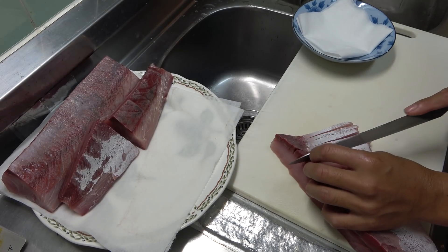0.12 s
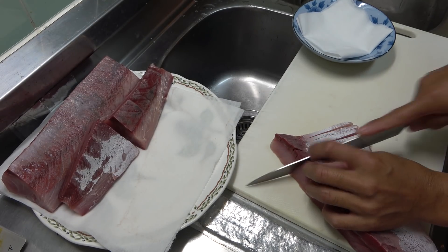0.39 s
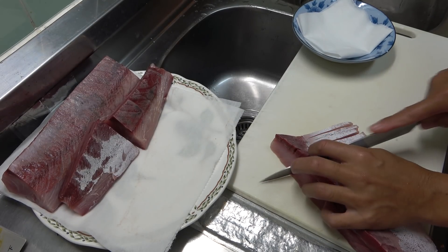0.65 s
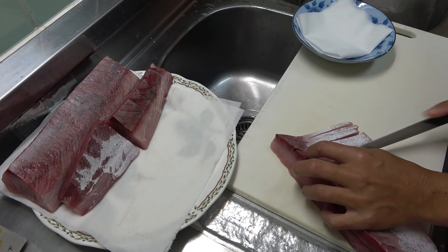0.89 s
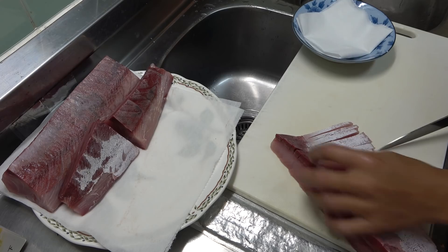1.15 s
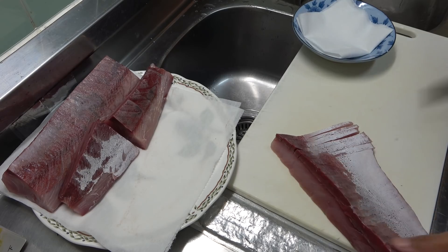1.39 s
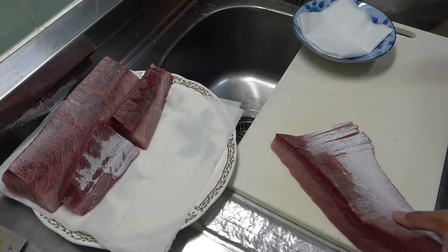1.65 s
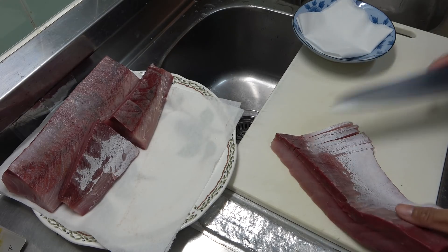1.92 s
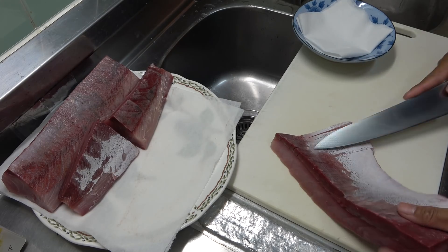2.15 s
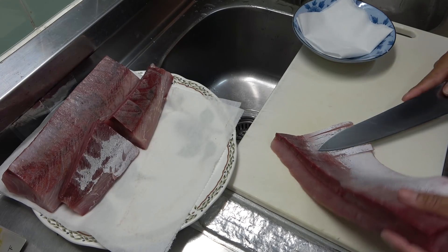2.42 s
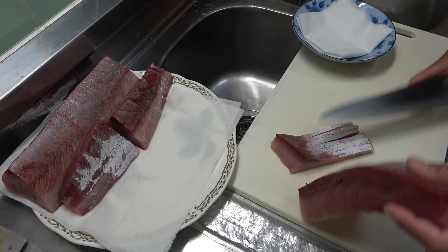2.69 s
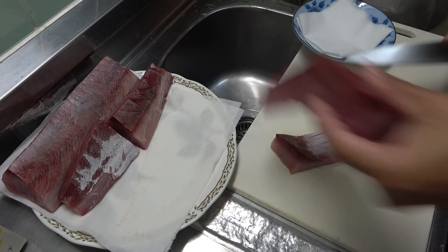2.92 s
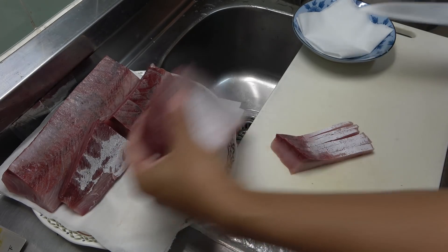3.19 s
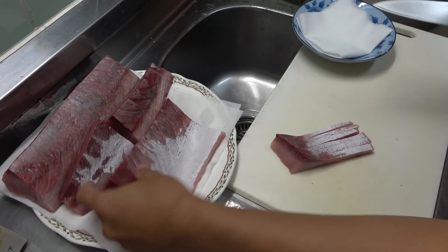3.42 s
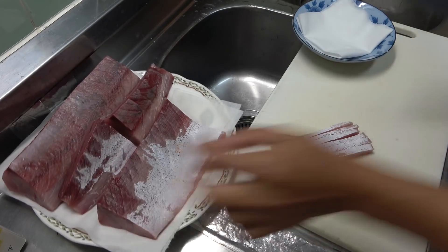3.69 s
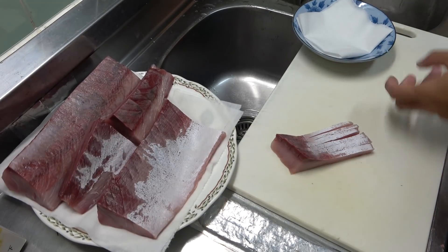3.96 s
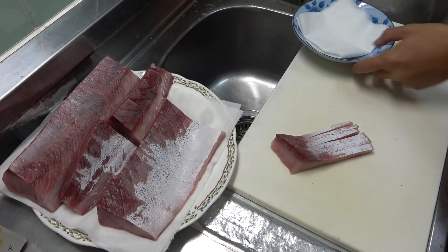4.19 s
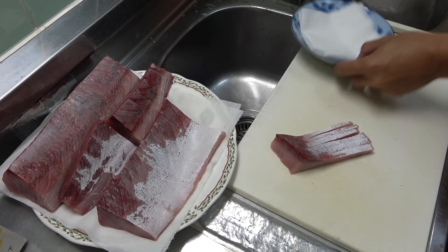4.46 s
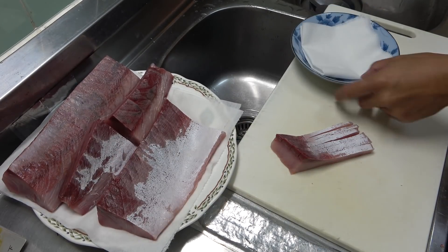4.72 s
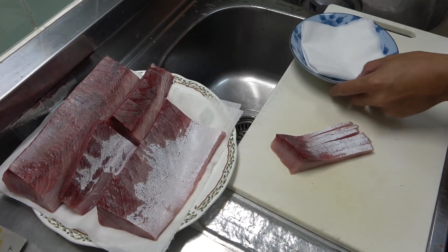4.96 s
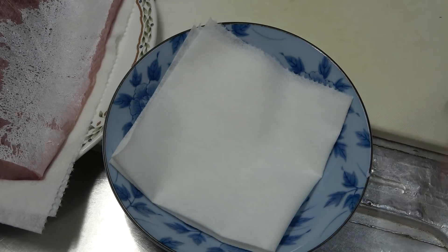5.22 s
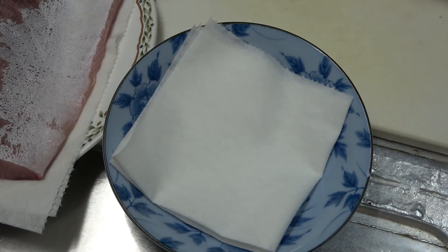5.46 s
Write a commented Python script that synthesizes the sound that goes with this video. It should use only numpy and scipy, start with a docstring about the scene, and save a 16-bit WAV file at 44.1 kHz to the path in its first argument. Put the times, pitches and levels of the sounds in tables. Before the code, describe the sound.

A low fan hum and soft hiss fill a small kitchen, heard close in stereo. A firm knock lands at 0.4 s with a short hollow counter rumble. Gentle blade rubbing and very faint fuzzy whistles follow until 1.3 s, with a small knock at 1.4 s. From 1.5 to 2.5 s wet flesh peels with bright ticks and fine crackle, among light knocks. Soft rubbing returns near 2.8 s. At 3.3 s a heavy, boomy knock hits the board, followed by a scrape; from 3.65 to 4.4 s the put-down knife rocks in paired, fading knocks with metallic pings. A bowl drags with a short groan around 4.45 s, bumps down in a quick cluster at 4.55 s, and rings faintly. At 5.0 s sound vanishes for an instant; the hum returns louder, with low handling rumble, swelling rubs and a few dull knocks until about 5.55 s.

```python
"""A knife slices raw fish on a plastic board lying on a steel counter, while a fan hums (shaped noise).
First the blade rubs (swelling noise), whistles faintly (fuzzy tones) and knocks (ringing modes and clatter),
and wet flesh ticks and crackles (short noise bursts and grainy noise). A heavy knock lands at 3.3 s; then the
knife, put down, rocks with fading knocks and pings. At 4.5 s a bowl drags, bumps down and rings faintly.
At 5.0 s all sound stops for about 0.03 s; the hum comes back louder, with more rubbing and a few knocks."""
import sys
import numpy as np
from scipy import signal
from scipy.fft import rfft, irfft, next_fast_len
from scipy.io import wavfile
from scipy.ndimage import uniform_filter1d

SR = 44100
rng = np.random.default_rng(int(sys.argv[2]) if len(sys.argv) > 2 else 0)


def dump_mix(stems):
    """Bounce the given channels to the path in sys.argv[1] as a 16-bit WAV at rate SR."""
    frames = np.atleast_2d(stems).T  # one column per channel
    limited = np.clip(frames, -1, 1)  # hard clip at full scale
    pcm = np.round(limited * 32767).astype(np.int16)
    wavfile.write(sys.argv[1], SR, pcm)


def invert_db(x):
    """Field ratio 10**(x/20) for x, a level in decibels (scalar or array-like)."""
    u = np.asarray(x, float) / 20
    return 10 ** u


N = 246959  # length in samples

# colour of the fan and microphone hiss: pitch_hz, level_db (per Hz)
FAN_COLOUR = [(15, -50), (25, -8), (134, -5.5), (206, -17), (384, -9.5), (439, -7), (503, -7.5), (607, -4),
              (659, 2), (988, -5.5), (1070, -9.5), (1370, -6.5), (1610, -37), (8830, -27), (16000, -36.5)]
# loudness of the fan and hiss over time: time_s, level_db
FAN_LEVEL = [(0, -53), (.8, -52), (2.6, -52), (5.0, -49.5), (5.04, -43.5), (5.6, -45)]
# how much stronger the left side is than the right: pitch_hz, left_over_right_db
LEFT_LEAN = [(100, 0), (300, .3), (700, 2.2), (1500, .6), (5000, .4), (14000, .8)]
# how alike left and right are for near sounds: pitch_hz, likeness (0 to 1)
NEAR_LIKENESS = [(60, .995), (150, .986), (400, .972), (900, .97), (2400, .985), (6000, .91), (15000, .72)]
# the same for the fan, heard from all around: pitch_hz, likeness (0 to 1)
FAN_LIKENESS = [(60, 1), (150, 0.33), (400, 0.64), (950, .8), (2400, 0.71), (6000, 0.13), (15000, 0.26)]

# colour of the counter's shaking: pitch_hz, level_db (per Hz)
SHAKE_COLOUR = [(20, -43), (40, 15.5), (70, -12), (100, 3), (160, 14), (300, 9.5), (500, 2.5), (1000, -51)]
# lowest modes of the counter, kept going by handling: pitch_hz, level_db, width_hz
COUNTER_BOOM = [(102.4, -1.5, 38), (160.3, -3.5, 8.3), (275.4, -4, 27), (447, -9, 33)]
# handling and heavy blows leave the counter shaking: strongest_s, rise_s, fall_s, level_db
SHAKES = [(.37, 0.17, 0.09, -48), (.45, 0.042, .13, -35), (.62, 0.18, 0.31, -50.5), (1.02, 0.073, .08, -57),
          (1.48, 0.12, 0.091, -55.5), (1.71, 0.085, .2, -48), (2.03, 0.26, 0.21, -54.5),
          (2.83, 0.17, 0.089, -51.5), (2.98, 0.1, 0.22, -56), (3.25, 0.11, .07, -51.5),
          (3.45, 0.17, 0.29, -34.5), (3.77, 0.21, 0.32, -35.5), (4.1, 0.4, 0.26, -41),
          (4.33, 0.19, 0.14, -42), (4.52, .12, .09, -37), (4.66, .08, 0.32, -39.5), (5.08, 0.13, 0.23, -40),
          (5.37, 0.22, 0.26, -42.5)]

# ringing modes of the glazed bowl: pitch_hz, level_db, width_hz
BOWL_MODES = [(3700, -8, 20), (5200, -8, 20), (8230, 1, 20), (9335, -2, 25), (10557, -7, 30),
              (11138, -6, 30), (12715, -12, 30), (13500, -14, 30)]
# the bowl's foot dragging or touched: strongest_s, rise_s, fall_s, level_db
BOWL_TOUCHES = [(4.29, .03, .06, -68), (4.5, .12, .22, -55), (4.75, .12, .2, -70), (5.0, .12, .12, -67),
                (5.555, .02, .06, -57)]
# modes of the board under the dragged bowl: pitch_hz, level_db, width_hz
DRAGGED_BOARD_MODES = [(199, 0, 25), (522, -10, 40), (684, -13, 70), (1120, -14, 70), (1620, -14, 90),
                       (2590, -22, 70), (2850, -22, 90), (4450, -25, 70), (5160, -27, 50), (5820, -28, 70)]
# loudness of the drag over time: time_s, level_db
DRAG_LEVEL = [(4.39, -68), (4.43, -37.5), (4.46, -30.5), (4.499, -25.5), (4.531, -29), (4.56, -44),
              (4.6, -90)]
# the bowl's foot bumping down on the board: time_s, knock_db, boom_db, body_db, edge_db
BOWL_BUMPS = [(4.536, -28.5, -46, -24, -45), (4.549, -21, -26.5, -14.5, -34.5),
              (4.561, -13, -21, -18, -25.5), (4.578, -27, -28, -25, -33)]

# colour of the crackle: pitch_hz, level_db (per Hz)
CRACKLE_COLOUR = [(4000, -30), (7000, -17), (9500, -4), (12000, -5), (16000, -19)]
# wet flesh peeling, a fine crackle: strongest_s, rise_s, fall_s, level_db
PEELS = [(1.65, .04, .07, -62), (1.77, .07, .1, -52.5), (2.1, 0.1, 0.17, -54.5), (2.28, 0.033, .06, -62)]
# wet flesh letting go of board and blade: time_s, level_db (before the snap's shape), centre_hz
TICKS = [(0.2324, -37.5, 4610), (0.4897, -33, 3620), (0.7881, -32, 7380), (1.2994, -44, 9320),
         (1.49, -34.5, 8360), (1.6312, -30.5, 10300), (1.7162, -29, 9600), (1.7394, -38, 7880),
         (1.7823, -25, 10400), (1.819, -36.5, 8770), (1.8394, -47, 8630), (1.918, -33, 3090),
         (2.052, -33, 8950), (2.0862, -33, 9850), (2.1294, -35, 11100), (2.1494, -36, 9410),
         (2.1835, -43, 8300), (2.2085, -33, 9150), (2.2762, -34, 10600), (2.3994, -44, 11900),
         (2.4972, -41, 10200), (3.1844, -46, 3160), (3.5224, -42, 3810), (5.141, -36, 8720),
         (5.1555, -34, 3940)]

# colour of the scrape: pitch_hz, level_db (per Hz)
SCRAPE_COLOUR = [(600, -1), (1200, -3), (2000, 0), (4000, -4), (6000, -10.5), (9000, -17), (16000, -53)]
# colour of the rubbing hiss: pitch_hz, level_db (per Hz)
HISS_COLOUR = [(2500, -15), (5000, -3), (9000, -3), (12000, -7.5), (16000, -14.5)]
# blade, fish or bowl rubbing on the board: strongest_s, rise_s, fall_s, scrape_db, hiss_over_scrape_db
STROKES = [(.25, .02, .1, -61.5, 7), (.37, 0.11, 0.07, -54, 2), (.52, .06, .1, -62, -6),
           (.75, 0.19, 0.25, -54.5, -0.5), (.94, 0.11, 0.16, -54, 0), (1.22, 0.26, 0.21, -61, 3),
           (1.48, 0.18, 0.068, -59.5, -3), (1.69, 0.12, 0.083, -52, -0.5), (1.8, 0.055, 0.073, -57.5, -1),
           (1.97, 0.13, .06, -60, -1), (2.12, .1, 0.16, -62.5, 5.5), (2.33, 0.099, 0.2, -64, 6.5),
           (2.81, 0.12, 0.072, -54, -3), (2.97, 0.088, 0.16, -60, -3.5), (3.28, 0.13, 0.044, -55.5, -6),
           (3.4, 0.088, 0.13, -41.5, -10.5), (3.52, 0.055, 0.074, -49, -5.5),
           (3.77, 0.19, 0.072, -51.5, -16), (3.98, .15, .15, -65.5, -6), (4.22, .15, .2, -61.5, -5),
           (4.48, 0.093, 0.092, -41.5, -15), (4.6, .06, 0.094, -50, -15), (4.95, .08, 0.091, -60, -24),
           (5.052, .02, 0.17, -51, -17), (5.3, .14, .1, -47.5, -4.5), (5.41, 0.11, 0.099, -43.5, -1.5),
           (5.56, 0.076, 0.035, -56.5, 3)]
# faint whistles of the drawn blade: start_s, end_s, start_pitch_hz, end_pitch_hz, level_db
WHISTLES = [(0.237, 0.362, 2680, 2720, -65), (0.248, 0.378, 4600, 4520, -65),
            (0.697, 1.302, 4150, 4230, -66), (1.13, 1.299, 10300, 9800, -75),
            (1.15, 1.322, 9000, 8600, -76), (1.563, 1.643, 2150, 2070, -57),
            (2.373, 2.412, 3100, 3060, -61), (2.449, 2.524, 3050, 3070, -64.5)]

# the five bands of a blow, in order knock, boom, body, edge, top: low_hz, high_hz
KNOCK_BANDS = [(500, 1050), (60, 200), (200, 500), (1250, 4000), (4000, 15000)]
# modes of board and steel counter, before small chance changes: pitch_hz, level_db, time_to_fall_60_db_s
COUNTER_MODES = [(105, -0.5, 0.5), (155.7, -1.5, 0.39), (282.6, -5, 0.22), (370.2, -11, 0.25),
                 (444.6, -5.5, 0.39), (538, -20, 0.27), (670, -4.5, 0.38), (739, -16.5, 0.34),
                 (820, -32, 0.43), (910, -22, 0.24), (1030, -9, 0.27), (1163, -19.5, 0.38),
                 (1277, -9.5, 0.2), (1514, -10.5, 0.24), (1840, -28, 0.37), (2035, -14, 0.14),
                 (2360, -27, 0.52)]
# colour of the dense part of a knock: pitch_hz, level_db (per Hz)
CLATTER_COLOUR = [(29, -41), (50, -16), (108, 2.5), (218, -9), (450, -11.5), (601, -9.5), (678, -10),
                  (1430, -18.5), (1620, -16.5), (7210, -33), (16000, -44)]
# how long the clatter lasts, before division by the damping: centre_hz, time_to_fall_60_db_s
CLATTER_FADE = [(80, 0.42), (200, 0.23), (500, 0.35), (1200, .28), (3000, 0.19), (7000, 0.21),
                (14000, 0.11)]
# blade, handle or fish knocking on the board: time_s, knock_db, boom_db, body_db, edge_db
KNOCKS = [(0.402, -15.5, -35, -23.5, -41), (0.538, -51, -62, -60, -48.5), (0.904, -56.5, -77, -57, -52),
          (1.396, -42, -69, -43, -37.5), (1.544, -59, -61, -62, -47), (1.652, -37.5, -47, -36.5, -43.5),
          (1.91, -52, -61, -58, -49), (1.999, -37, -43, -41.5, -41.5), (2.712, -53, -71, -52.5, -52),
          (2.835, -64, -42.5, -56, -49), (3.255, -73, -35, -41, -62), (3.3, -38, -48, -40, -46.5),
          (3.312, -18, -9.5, -16, -18.5), (3.336, -23, -36, -50, -24), (4.297, -60, -39, -37.5, -55),
          (5.06, -48, -44, -49, -48.5), (5.09, -49, -44, -42, -52), (5.355, -59, -40, -30.5, -60)]
# the put-down knife rocking, handle first: handle_s, handle_db, blade_s, blade_db
ROCKS = [(3.649, -32.5, 3.68, -24.5), (3.848, -37.5, 3.889, -43.5), (4.041, -44.5, 4.079, -43),
         (4.217, -49, 4.253, -45.5), (4.363, -52, 4.387, -46.5)]
# handle end, one row for each knock band: level_db, follow (band dB per dB of strength)
HANDLE_END = [(-0.5, 0.99), (0.5, 0.84), (15, 1.09), (-24.5, 0.52), (-47.5, 0.21)]
# blade end, one row for each knock band: level_db, follow (band dB per dB of strength)
BLADE_END = [(-0.5, 1.015), (-1, 0.66), (0.5, 1.42), (0, 1), (-33, 0.42)]
# modes of the loose blade, before chance: pitch_hz, level_over_top_band_db, time_to_fall_60_db_s
BLADE_MODES = [(1270, 7, .13), (1730, 2, .13), (2220, 9, .11), (2660, -1, .1), (3580, -2, .1),
               (4330, -6, .08), (5045, 4, .12), (6780, -10, .06), (7950, -8, .12), (9650, -10, .11),
               (12410, -10, .1)]
# the moment without sound: start_s, end_s
SILENT_MOMENT = (5.004, 5.037)


def evened(x):
    """Scales a sound to an average strength (rms) of 1."""
    return x / np.sqrt(np.mean(x ** 2) + 1e-20)


def read(points, hz):
    """Reads a curve between its points, with pitch on a log scale."""
    f, value = np.transpose(points)
    return np.interp(np.log(hz + 1), np.log(f + 1), value)


def along(rows):
    """Reads a time curve at every sample."""
    times, values = np.transpose(rows)
    return np.interp(np.arange(N) / SR, times, values)


def add(mix, s, sound):
    """Mixes a sound in at a time in seconds."""
    part = mix[:, round(s * SR):][:, :sound.shape[1]]
    part += sound[:, :part.shape[1]]


def left_right_lean(hz):
    """Splits the lean in dB evenly: half up on the left, half down on the right."""
    return np.outer([.5, -.5], read(LEFT_LEAN, hz))


def pair(white, colour, likeness=NEAR_LIKENESS):
    """Spectra for two microphones: coloured noise, partly alike on both sides."""
    hz = np.fft.rfftfreq(white.shape[1], 1 / SR)
    a, b = rfft(white)
    same = np.clip(read(likeness, hz), 0, 1)
    mid = np.sqrt((1 + same) / 2) * a
    side = np.sqrt((1 - same) / 2) * b
    both = np.array([mid + side, mid - side])
    return both * invert_db(left_right_lean(hz)) * invert_db(read(colour, hz))


def bed(colour, grain_db, likeness=NEAR_LIKENESS):
    """Lasting coloured noise made of grains of uneven size."""
    size = next_fast_len(N)
    lumps = evened(uniform_filter1d(rng.standard_normal(size), size=90))
    white = rng.standard_normal((2, size)) * invert_db(grain_db * lumps)
    return evened(irfft(pair(white, colour, likeness), size)[:, :N])


def swells(rows, pointed, resting_db=-100):
    """Level of a string of arches, each rising to its peak and falling away; powers add."""
    t = np.arange(N) / SR
    power = invert_db(resting_db) ** 2 * np.ones(N)
    for s, rise, fall, db in rows:
        ramp = np.interp(t, [s - rise, s, s + fall], [0, 1, 0])
        arch = np.sin(np.pi / 2 * ramp)
        power = power + (invert_db(db) * arch ** pointed) ** 2
    return np.sqrt(power)


def singing(modes, fitful_db):
    """Uneven friction keeps narrow modes singing, each getting stronger and weaker by chance."""
    out = np.zeros((2, N))
    for hz, db, width in modes:
        r = np.exp(-np.pi * width / SR)  # a narrower mode rings longer
        fits = invert_db(fitful_db * evened(uniform_filter1d(rng.standard_normal(N), size=1500)))
        push = rng.standard_normal(N) * fits
        ring = signal.lfilter([1, 0, -1], [1, -2 * r * np.cos(2 * np.pi * hz / SR), r * r], push)
        out += invert_db(db + left_right_lean(hz)) * evened(ring)
    return evened(out)


def fan():
    """Fan hum and microphone hiss: shaped noise, much of it different on the two sides."""
    return invert_db(along(FAN_LEVEL)) * bed(FAN_COLOUR, grain_db=.6, likeness=FAN_LIKENESS)


def counter_shaking():
    """Handling and blows shake the counter: low noise plus its lowest modes."""
    boom = invert_db(-3.5) * singing(COUNTER_BOOM, fitful_db=1.5)
    shake = evened(bed(SHAKE_COLOUR, grain_db=1.5) + boom)
    # hands and fish never lie quite still, so a little shaking stays
    return swells(SHAKES, pointed=2.4, resting_db=-71.5) * shake


def bowl_ringing():
    """Friction or touch on the bowl's foot keeps its high modes ringing faintly."""
    return swells(BOWL_TOUCHES, pointed=1.2) * singing(BOWL_MODES, fitful_db=1.5)


def bowl_drag():
    """The dragged bowl makes the modes of the board under it sing."""
    return invert_db(along(DRAG_LEVEL)) * singing(DRAGGED_BOARD_MODES, fitful_db=-1.0)


def peeling():
    """Wet flesh peels off in many tiny snaps: very grainy bright noise."""
    return swells(PEELS, pointed=1.1) * bed(CRACKLE_COLOUR, grain_db=8.0)


def tick(db, centre_hz):
    """Wet flesh lets go: a snap of a few cycles and its short bright reflection."""
    t = np.arange(2048) / SR
    # times the centre pitch, level in dB
    bell = [(.4, -22), (.75, -5), (1, 0), (1.2, -6), (1.6, -20), (3.5, -26)]
    colour = [(centre_hz * ratio, bell_db) for ratio, bell_db in bell]
    noise = evened(irfft(pair(rng.standard_normal((2, len(t))), colour)))
    snap = 0.3 * np.exp(-t / 0.00085)
    reflection = 0.099 * np.exp(-t / 0.018)
    return invert_db(db) * noise * (snap + reflection)


def rubbing():
    """Friction along the board: each stroke swells a scrape and a brighter hiss."""
    scrapes = [row[:4] for row in STROKES]
    hisses = [(s, rise, fall, db + over_db) for s, rise, fall, db, over_db in STROKES]
    # hands and fish never lie quite still, so a little rubbing stays
    scrape = swells(scrapes, pointed=1.0, resting_db=-68) * bed(SCRAPE_COLOUR, grain_db=1.0)
    hiss = swells(hisses, pointed=0.95, resting_db=-69.5) * bed(HISS_COLOUR, grain_db=1.5)
    return scrape + hiss


def whistle(length, hz, end_hz, db):
    """The drawn blade whistles, a fuzzy gliding tone: slow noise carried on a sine."""
    count = round(length * SR)
    turns = np.cumsum(np.linspace(hz, end_hz, count)) / SR
    a, b = uniform_filter1d(rng.standard_normal((2, count)), size=150, axis=1)
    tone = evened(a * np.cos(2 * np.pi * turns) + b * np.sin(2 * np.pi * turns))
    return invert_db(db) * tone * signal.windows.tukey(count, .4) * np.ones((2, 1))


def knock_clatter(size, damping):
    """The dense part of a knock: a crack, then noise that dies away band by band."""
    t, hz = np.arange(size) / SR, np.fft.rfftfreq(size, 1 / SR)
    spectra = pair(rng.standard_normal((2, size)), CLATTER_COLOUR)
    clatter = 0
    for k, (centre, t60) in enumerate(CLATTER_FADE):
        share = read([(f, j == k) for j, (f, _) in enumerate(CLATTER_FADE)], hz)
        rise = 1 - np.exp(-t / (0.00087 + 0.34 / centre))  # bass swells more slowly
        clatter = clatter + irfft(spectra * share, size) * rise * invert_db(-60 * damping * t / t60)
    return clatter * (1 + 0.35 * np.exp(-t / 0.0076))  # the direct crack


def knock_modes(size):
    """Board and counter ring as fading sines, each with chance pitch, strength and sign."""
    t, hz = np.arange(size) / SR, np.fft.rfftfreq(size, 1 / SR)
    f, db, t60 = np.transpose(COUNTER_MODES)[:, :, None]
    luck = rng.standard_normal((len(f), 3))
    turns = f * (1 + 0.0084 * luck[:, :1]) * t
    size_db = db + 3 * luck[:, 1:2]
    fading = np.sign(luck[:, 2:]) * invert_db(size_db - 60 * t / t60)
    modes = (fading * np.sin(2 * np.pi * turns)).sum(0)
    modes = modes * (1 - np.exp(-t / 0.00021))  # soft start
    return irfft(rfft(modes) * invert_db(left_right_lean(hz)), size)


def knock(levels_db, damping):
    """A blow rings the modes over a clatter; its hardness and place set the level of each band."""
    size = 32768
    hz = np.fft.rfftfreq(size, 1 / SR)
    clatter = evened(knock_clatter(size, damping))
    blow = rfft(clatter + invert_db(-2.5) * evened(knock_modes(size)))
    power = (abs(blow) ** 2).mean(0) * 2 / size / (.025 / damping * SR)
    colour = []
    for (low, high), db in zip(KNOCK_BANDS, levels_db):
        band_power = power[(hz > low) & (hz < high)].sum()
        colour.append((np.sqrt(low * high), db - 10 * np.log10(band_power)))
    low_cut = hz ** 2 / (hz ** 2 + 55 ** 2)
    shaped = blow * low_cut * invert_db(read(sorted(colour), hz))
    return irfft(shaped, size)[:, :size * 3 // 4]


def add_knocks(mix, rows, top_db):
    """Adds blows; the more edge a blow has over its knock, the more top band it gets as well."""
    for s, *levels_db in rows:
        knock_db, edge_db = levels_db[0], levels_db[-1]
        band_top_db = edge_db + top_db + 0.23 * (edge_db - knock_db)
        add(mix, s, knock([*levels_db, band_top_db], damping=0.96))


def blade_ping(top_db):
    """The loose blade pings at its own modes, the more the harder it lands."""
    t = np.arange(8192) / SR
    f, db, t60 = np.transpose(BLADE_MODES)[:, :, None]
    size_db = top_db + db + 4 * rng.standard_normal(f.shape)
    ping = (invert_db(size_db - 60 * t / t60) * np.sin(2 * np.pi * f * t)).sum(0)
    return ping * (1 - np.exp(-t / 0.0026)) * np.ones((2, 1))


def add_rocking_knife(mix):
    """The knife rocks from handle to blade; each landing knocks and makes the blade ping."""
    for handle_s, handle_db, blade_s, blade_db in ROCKS:
        for s, db, end in [(handle_s, handle_db, HANDLE_END), (blade_s, blade_db, BLADE_END)]:
            levels_db = [band_db + follow * db for band_db, follow in end]
            add(mix, s, knock(levels_db, damping=1.18))
            add(mix, s, blade_ping(levels_db[-1]))


def scene():
    """All sources at the two microphones, from the background to the knife."""
    mix = fan() + counter_shaking() + bowl_ringing() + bowl_drag() + peeling() + rubbing()
    for s, db, hz in TICKS:
        add(mix, s, tick(db, hz))
    for start, end, *tone in WHISTLES:
        add(mix, start, whistle(end - start, *tone))
    add_knocks(mix, BOWL_BUMPS, top_db=-31)  # the bowl's foot is dull
    add_rocking_knife(mix)
    add_knocks(mix, KNOCKS, top_db=-4.5)  # steel is bright
    return mix


def roll_off(x):
    """The treble ends steeply here."""
    return signal.sosfilt(signal.butter(12, 16500, fs=SR, output="sos"), x)


def record(dry):
    """The microphone's input rounds off the tallest peaks; the sound stops for a moment."""
    start, end = SILENT_MOMENT
    t = np.arange(N) / SR
    sound_on = np.interp(t, [start - .002, start, end - .001, end], [1, 0, 0, 1])
    ceiling = 1.1  # no peak can pass this
    mix = ceiling * np.tanh(dry / ceiling) * sound_on
    return roll_off(mix)


dry = scene()
out = record(dry)
dump_mix(out)
```